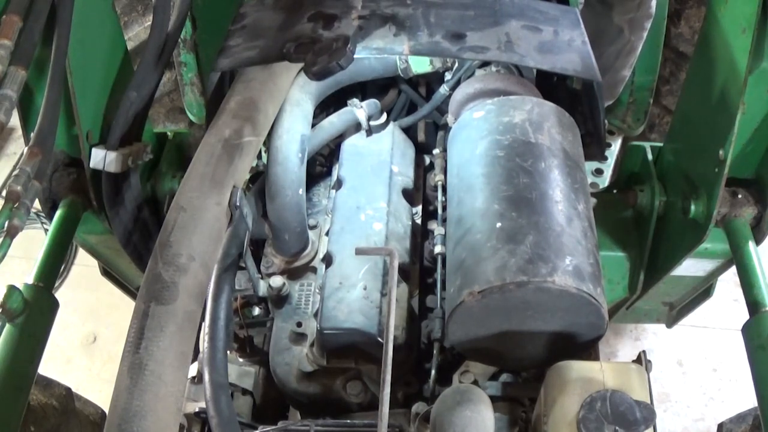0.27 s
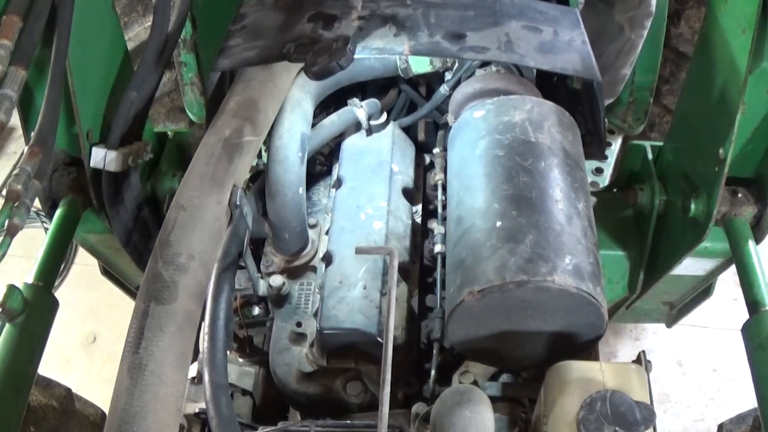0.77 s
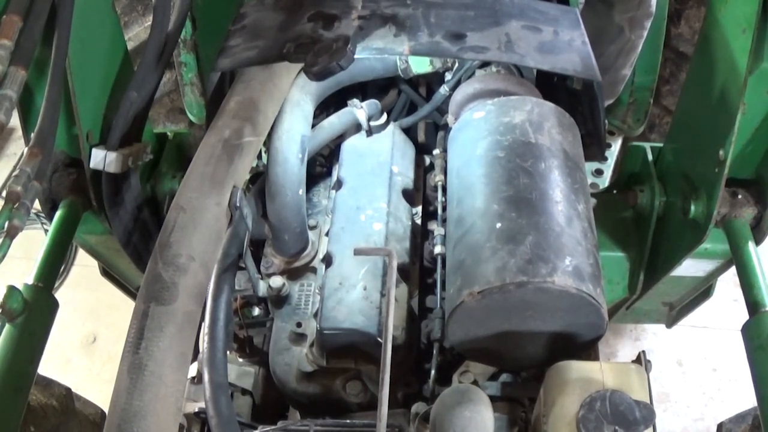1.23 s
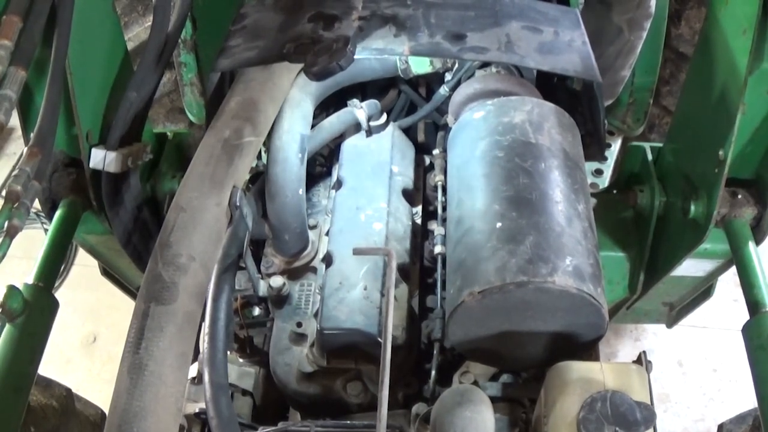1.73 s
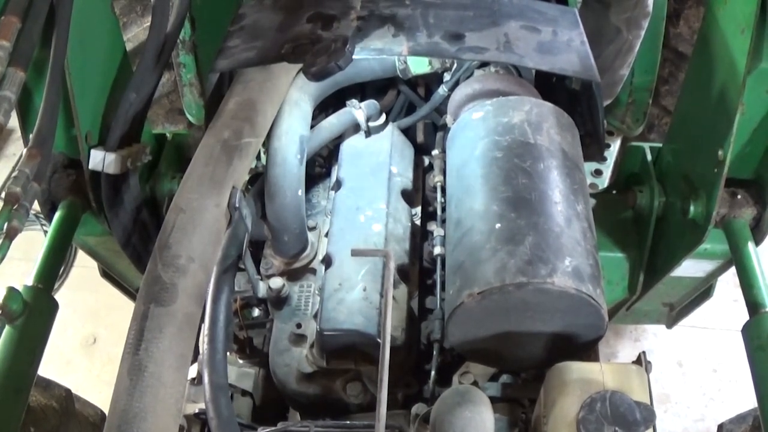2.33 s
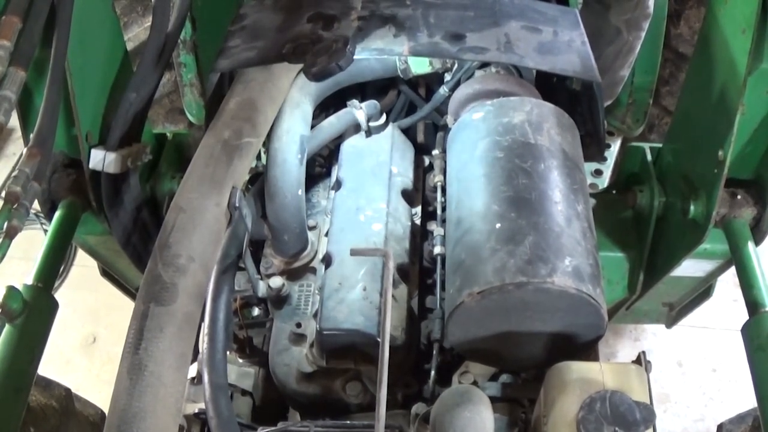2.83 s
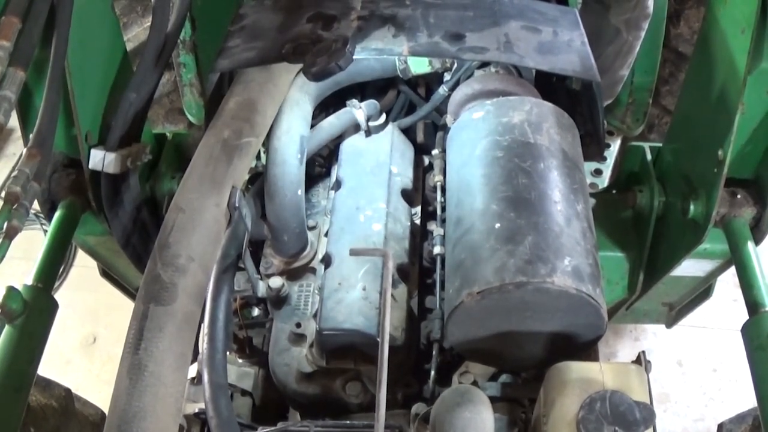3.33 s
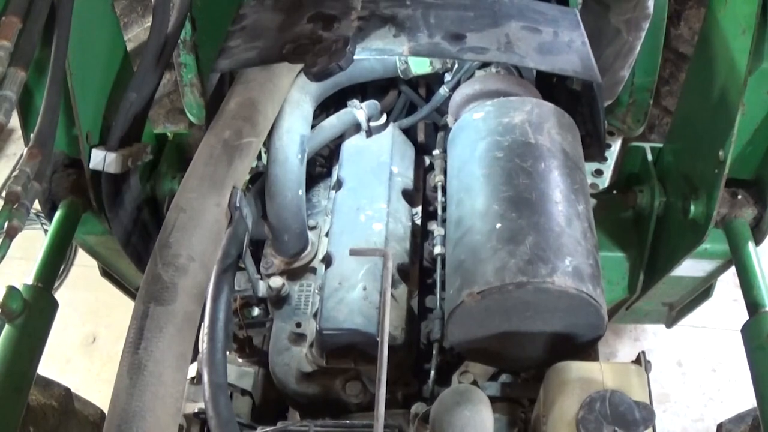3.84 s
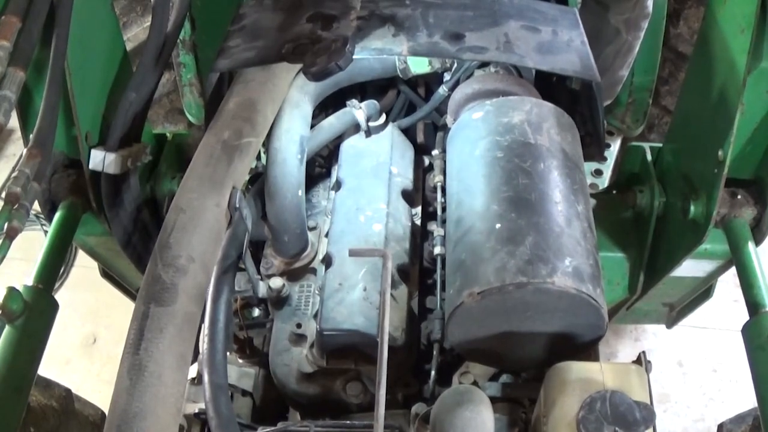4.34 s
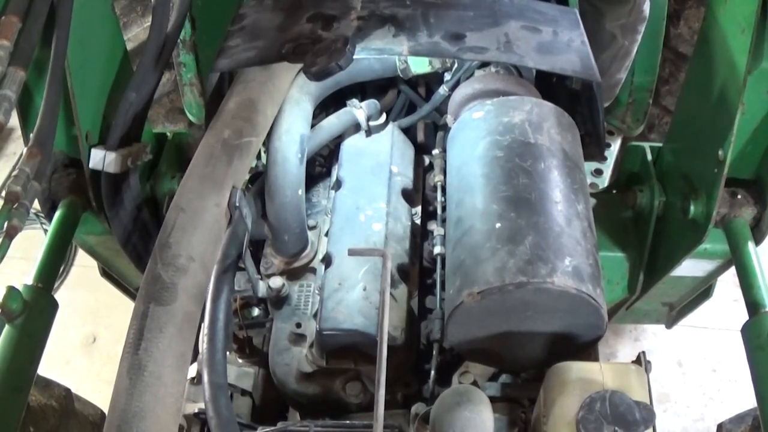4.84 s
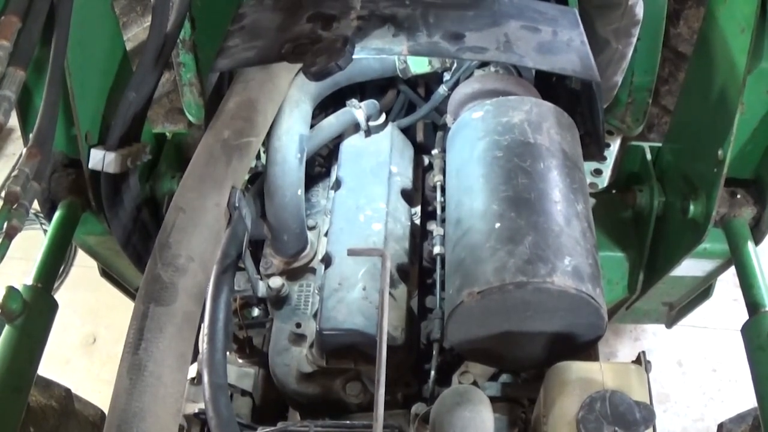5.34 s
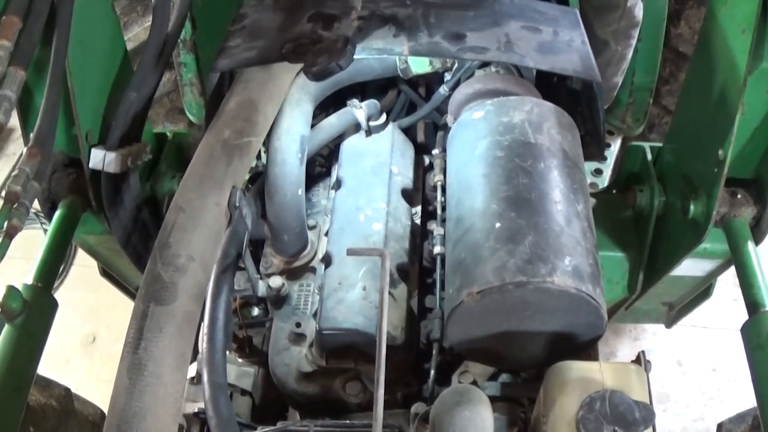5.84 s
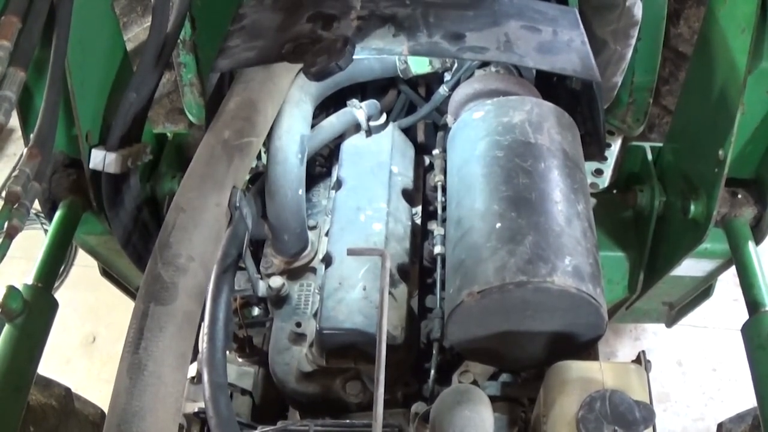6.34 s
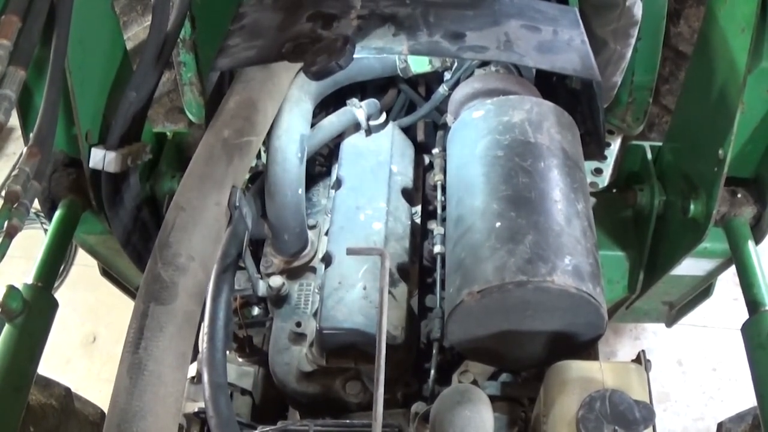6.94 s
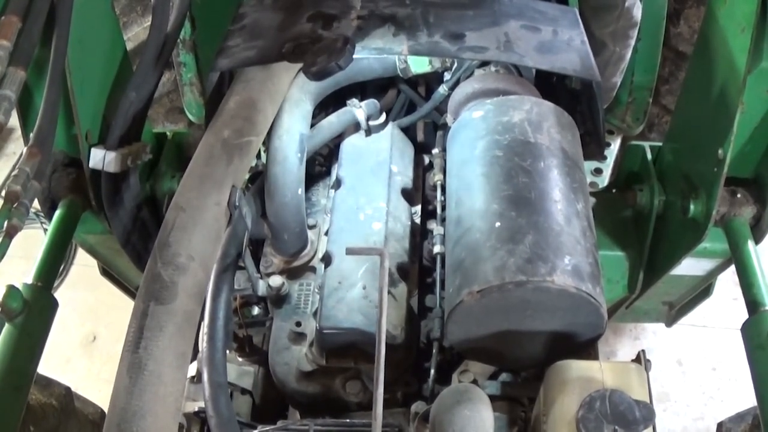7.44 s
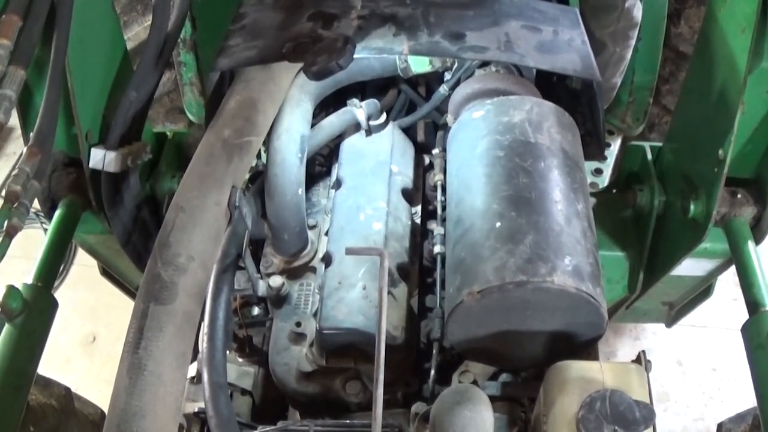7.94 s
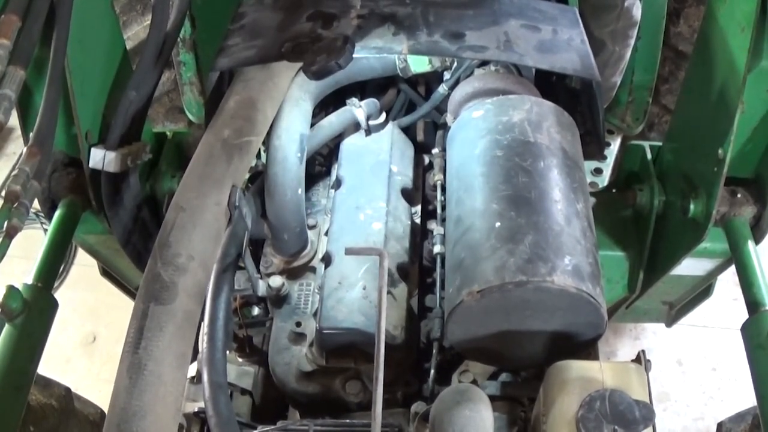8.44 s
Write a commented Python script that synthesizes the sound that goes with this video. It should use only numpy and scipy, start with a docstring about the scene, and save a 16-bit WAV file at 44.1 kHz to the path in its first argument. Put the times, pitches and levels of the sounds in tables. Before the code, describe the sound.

A quiet workshop with faint airy noise and a thin wavering hum. Under a second in, a hard metallic clash and thud: the starter engages, groans and squeals through the first compressions, then speeds into a rapid, steady rur-rur-rur, about five and a half pulses a second. Gritty tooth grinding, whine, chirps and low intake gulps repeat. The engine never fires. Close stereo microphone, short metallic room echo.

```python
"""In a workshop with a faint wavering hum, a diesel tractor engine is cranked and never fires.
The solenoid throws the pinion in, with decaying noise strokes for clash and thud, and the starter runs up.
Gear tones and tooth blows follow one crank cycle: each compression drags them down and makes the teeth grind.
Past the top the crank springs ahead, the teeth rattle in their backlash, and filtered noise and a rising
sine make the intake gulp and hoot. Metalwork resonances and a decaying noise echo colour the sound."""
import sys
import numpy as np
from scipy import signal
from scipy.fft import rfft, irfft, next_fast_len
from scipy.io import wavfile
from scipy.ndimage import uniform_filter1d, minimum_filter1d, map_coordinates

SR = 44100
rng = np.random.default_rng(int(sys.argv[2]) if len(sys.argv) > 2 else 0)


def dump(signal):
    """Clip the signal to [-1, 1] and save it as 16-bit WAV at the path in sys.argv[1]."""
    limited = np.clip(np.atleast_2d(signal).T, -1, 1)
    pcm = np.round(limited * 32767).astype(np.int16)
    wavfile.write(sys.argv[1], SR, pcm)


N = 383229
START = .783  # s, when the starter engages


def amp(db):
    """Logarithmic level: decibels to amplitude gain."""
    return 10 ** (np.asarray(db) / 20)


def unit(x):
    """Power normalisation: scale to rms 1."""
    return x / np.sqrt(np.mean(x ** 2) + 1e-20)


def clock():
    """Sampled time: the time of each sample in seconds."""
    return np.arange(N) / SR


def along(points, hz):
    """Logarithmic frequency scale: read (Hz, value) points along a log axis."""
    f, v = np.transpose(points)
    return np.interp(np.log(hz + 1), np.log(f + 1), v)


def curves(rows, at):
    """Linear interpolation: each column after the first, read at the given positions."""
    positions, *columns = np.transpose(rows)
    return [np.interp(at, positions, column) for column in columns]


def wobble(rate):
    """Slow random modulation: a smooth curve with the given number of knots a second."""
    knots = rng.standard_normal(int(N * rate / SR) + 4)
    return map_coordinates(knots, [np.arange(N) * rate / SR])


def coloured(x, level):
    """Minimum-phase filtering: a causal filter whose gain in dB is level(Hz)."""
    size = 2 * next_fast_len(N // 2 + SR // 4)
    cepstrum = irfft(np.log(amp(level(np.fft.rfftfreq(size, 1 / SR)))))
    # folding the cepstrum onto positive times makes the filter causal
    cepstrum[1:size // 2] *= 2
    cepstrum[size // 2 + 1:] = 0
    return irfft(rfft(x, size) * np.exp(rfft(cepstrum)))[..., :N]


def noise(spectrum):
    """Turbulence and friction as random noise: rms 1, with the given spectrum."""
    return unit(coloured(rng.standard_normal(N), lambda hz: along(spectrum, hz)))


def ringing(x, modes):
    """Modal resonance: x through the summed responses of a few damped modes, at rms 1."""
    def response(f):
        total = 0
        for k, (centre, width, db) in enumerate(modes):
            damping = 1j * f * width
            total = total + (-1) ** k * amp(db) * damping / (centre * centre - f * f + damping)
        return total
    return unit(coloured(x, lambda hz: 20 * np.log10(abs(response(hz)) + 1e-6)))


def swing(stroke, at):
    """Periodic loading: between -1 and 1 once a stroke, highest at the given share of it."""
    return np.cos(2 * np.pi * (stroke - at))


def burst(stroke, at, width, rest_db):
    """Gated excitation: dB of one flat-topped burst a stroke, 0 at its top, over a resting level."""
    away = (stroke - at + .5) % 1 - .5
    return rest_db * (1 - np.exp(-(away / width) ** 4))


def swell(s, half):
    """Transient envelope: a flat-topped rise and fall around the time s."""
    return np.exp(-((clock() - s) / half) ** 4)


def rough_tone(cycles, rough, wander):
    """Amplitude and phase modulation: a sine that flutters in strength and phase."""
    phase = 2 * np.pi * cycles + wander * wobble(170)
    return np.sin(phase) * (1 + rough * wobble(220))


# Background noise of the quiet workshop. Each row: frequency in Hz, relative density in dB per Hz.
ROOM_NOISE = [(18, -61), (30, -38), (148, -15.5), (369, -4.5), (399, 1), (673, -4.5), (1230, -3.5),
              (1360, -8), (1550, -8), (1680, -9), (6050, -14), (12900, -25.5), (15500, -27)]
# Machine hum. Each row: frequency in Hz, mean level in dB.
HUM_TONES = [(398.4, -76), (796.7, -72), (1593, -64), (8522, -73)]


def ambience():
    """Steady background field: shared and separate room noise, with a gently wavering machine hum."""
    hum = np.zeros(N)
    for hz, db in HUM_TONES:
        phase = 2 * np.pi * hz * clock() + .2 * wobble(7)
        hum += amp(db + wobble(7.6)) * np.sqrt(2) * np.sin(phase)
    separate = np.array([noise(ROOM_NOISE), noise(ROOM_NOISE)])
    return amp(-57.0) * noise(ROOM_NOISE) + hum + amp(-61.0) * separate


# Decay of the room. Each row: frequency in Hz, t60 in seconds.
ROOM_DECAY = [(200, 0.79), (1500, 0.56), (5000, 0.13), (12000, 0.3)]
# Stereo spread of the echoes. Each row: frequency in Hz, relative side level in dB.
ECHO_WIDTH = [(60, -19), (250, -7), (500, -5), (2000, -3), (8000, 0), (12000, -22)]


def workshop(x, wet_db, side_db):
    """Reverberation: nearby metal and walls answer in a dense tail, partly different at the two ears."""
    hz, t, z = signal.stft(rng.standard_normal((2, SR // 2)), SR, nperseg=256)
    fade = amp(-60 * t / along(ROOM_DECAY, hz)[:, None])
    tails = signal.istft(z * fade, SR, nperseg=256)[1]
    tails = tails / np.linalg.norm(tails[0])
    delayed = np.pad(x, (SR // 300, 0))[None]  # 1/300 s to the first echo
    mid, side = signal.fftconvolve(delayed, tails, axes=1)[:, :N]
    side = amp(side_db) * coloured(side, lambda f: along(ECHO_WIDTH, f))
    return x + amp(wet_db) * mid + np.array([side, -side])


# Mean pace: the crank runs up, holds, then sags a little.
# Each row: time in seconds, compression strokes per second.
CRANK_PACE = [(.78, 1), (.86, 2.48), (1.04, 3.72), (1.16, 4.6), (1.4, 5.04), (2.3, 5.48), (4.2, 5.507),
              (6.7, 5.512), (7.3, 5.4), (8.69, 5.35)]
# The starter labours through the first two compressions. Each row: time in seconds, tooth rate in Hz.
LABOURED_RUN_UP = [(.78, 60), (.85, 215), (.94, 293), (1.0, 299), (1.045, 293), (1.08, 355), (1.12, 432),
                   (1.195, 465), (1.24, 382), (1.26, 380), (1.3, 412), (1.34, 465)]
# Speed within a stroke. Each row: share of the stroke, speed as a share of the mean.
STROKE_SURGE = [(0, .878), (.12, .935), (.2, .988), (.4, 1.052), (.6, 1.098), (.75, 1.04), (.85, .955),
                (.93, .878), (1, .878)]
FIRST_TOP_S = 1.042  # top of the first compression; shares of a stroke count from each top
TEETH_PER_STROKE, STROKES_PER_TURN = 91.4, 3  # tooth blows per stroke, strokes per turn of the crank


def crank():
    """Cyclic torque loading: stroke position, strokes per second, and a tooth rate dragged by compression."""
    t = clock()
    pace, = curves(CRANK_PACE, t)
    strokes = np.cumsum(pace) / SR
    stroke = (strokes - np.interp(FIRST_TOP_S, t, strokes)) % 1
    surge, = curves(STROKE_SURGE, stroke)
    run_up_hz, = curves(LABOURED_RUN_UP, t)
    tooth_hz = np.where(t < LABOURED_RUN_UP[-1][0], run_up_hz, TEETH_PER_STROKE * pace * surge)
    return stroke, pace, uniform_filter1d(tooth_hz, size=300) * (1 + .004 * wobble(30))


# Course of the bass. Each row: time in seconds, relative level in dB.
BASS_COURSE = [(1.1, -5.5), (2.2, -3.6), (5.8, -3), (7.1, -7), (8.69, -9)]


def bass_level():
    """Slow spectral balance: the course of the bass in dB."""
    return curves(BASS_COURSE, clock())[0]


# A cylinder draws air. Each row: share of the stroke, relative flow in dB.
INTAKE_FLOW = [(0, -20), (.15, -11), (.3, -10), (.45, 0), (.65, -8), (.8, -22), (1, -20)]
# Air box resonances. Each row: frequency in Hz, width in Hz, relative level in dB.
AIR_BOX_MODES = [(94, 31, -6), (233, 24, -2)]
# Rocking of the engine block. Each row: frequency in Hz, relative density in dB per Hz.
BLOCK_NOISE = [(20, -3), (50, -6), (100, 1), (170, -8), (300, -23), (800, -80)]
LOAD_AT, LOAD_DB = 0.91, 1.06  # tooth load peaks just before the top: share of the stroke, +- dB
HEAVE_DB = 8.5  # the block heaves with the load, +- dB
HOOT_CYCLES, HOOT_RISE = 37.3, .45  # cycles of the hoot per stroke, its rise in pitch (share per stroke)
INTAKE_AT = .51  # share of the stroke where the hoot passes its middle pitch
HOOT_DB, GULP_DB, ROCK_DB = -47.5, -55.5, -67  # gains before the flow, bass and load shape them


def engine(stroke, pace):
    """Cavity resonance: each cylinder draws a gulp and rising hoot, and the block rocks at each compression."""
    flow_db, = curves(INTAKE_FLOW, stroke)
    turning = np.clip((clock() - START) / 0.65, 0, 1)
    air = noise([(40, -20), (90, 4.0), (240, 15.5), (400, -26), (1000, -85)])
    gulps = ringing(amp(0.28 * flow_db + 4.5 * swing(stroke, 0.61)) * air, AIR_BOX_MODES)
    hoot_hz = HOOT_CYCLES * pace * (1 + HOOT_RISE * (stroke - INTAKE_AT))
    hoot_phase = 2 * np.pi * np.cumsum(hoot_hz) / SR + .3 * wobble(70)
    hoot = amp(flow_db + wobble(12)) * np.sin(hoot_phase)
    rocking = amp(HEAVE_DB * swing(stroke, LOAD_AT)) * noise(BLOCK_NOISE)
    low = amp(bass_level()) * (amp(GULP_DB) * gulps + amp(ROCK_DB) * rocking)
    return turning * (amp(HOOT_DB) * turning ** 2 * hoot + low)


# Resonances and dips of the bell housing and panels.
# Each row: frequency in Hz, width in Hz, lift in dB.
HOUSING_MODES = [(298, 16, -1.5), (365.6, 7.7, 4.5), (477, 16, 5), (510, 16, 3.5), (560, 12, 4),
                 (598.7, 30, 6.5), (685, 30, 2.5), (907.4, 27.6, 6), (996, 33, 5), (1292, 17, -3),
                 (1470, 22, 3.5), (1594, 47, 2.5), (1670, 14, 4.5), (1820, 53, 1.5), (1914, 72, 6),
                 (2003, 29, 2.5), (2300, 77, 3.5), (2750, 80, 2.5), (3035, 107, 4.5), (3260, 60, 4),
                 (3474, 61, 6), (3710, 85, 2), (4300, 110, 3), (4970, 82, 6), (6230, 340, 1),
                 (7660, 190, 2.5), (8200, 200, 3.5)]


def housing(hz):
    """Structural resonance: lift in dB that the metalwork gives each frequency."""
    return sum(db / (1 + (2 * (hz - c) / w) ** 2) for c, w, db in HOUSING_MODES)


# A faint tick, then solenoid, pinion and gear engaging.
# Each row: start in seconds, clash level in dB, thud level in dB, t60 in seconds.
ENGAGE_STROKES = [(.455, -51, -70, .1), (.775, -40, -60, .1), (.783, -17.5, -50, .2),
                  (.816, -19.5, -45, .2), (.845, -28, -28, .3), (.89, -33, -33, .25)]
# Spectrum of the clash. Each row: frequency in Hz, relative density in dB per Hz.
CLASH_NOISE = [(100, -37), (400, -8), (900, -2), (1800, 5), (3000, -1), (5000, -1), (9000, -5),
               (11000, -14), (15500, -30)]
# Spectrum of the thud. Each row: frequency in Hz, relative density in dB per Hz.
THUD_NOISE = [(30, -40), (85, -7), (200, 2), (330, 5.5), (600, 10.5), (1000, 8), (3000, -51)]


def engagement():
    """Impact excitation: the pinion slams into the ring gear and the engine jolts into motion."""
    clash, thud = np.zeros(N), np.zeros(N)
    for s, clash_db, thud_db, t60 in ENGAGE_STROKES:
        age = np.maximum(clock() - s, 0)
        decay = (1 - np.exp(-age / 0.0018)) * amp(-60 * age / t60)
        clash += amp(clash_db) * decay
        thud += amp(thud_db) * decay
    return coloured(clash * noise(CLASH_NOISE) + thud * noise(THUD_NOISE), housing)


def inrush():
    """Inertial loading: strain of 1 when the starter engages, fading as the flywheel comes up to speed."""
    inrush_s = 0.39
    return np.exp(-(np.maximum(clock() - START, 0) / inrush_s) ** 2)


def impacts(teeth, scatter_db, scrape):
    """Tooth impact and friction: one uneven, mistimed blow per tooth, with sliding noise throughout."""
    count = int(teeth[-1])
    at = np.searchsorted(teeth, np.arange(count) + rng.random(count))
    sizes = amp(scatter_db * np.clip(rng.standard_normal(count), -2, 2)) * rng.choice([-1, 1], count)
    blows = unit(np.bincount(at, sizes, N)[:N])
    return unit(blows + scrape * rng.standard_normal(N))


def pinion_beat(teeth, runout):
    """Eccentric rotation: a gain that swells once per turn of the slightly eccentric pinion."""
    pinion_teeth = 11
    return 1 + runout * np.sin(2 * np.pi * teeth / pinion_teeth)


# Chirps of the floating pinion in each stroke.
# Each row: share of the stroke, half length as a share, frequency in Hz, level in dB.
PINION_CHIRPS = [(.582, .024, 8300, -27), (.62, .05, 6500, -29.5), (.645, .065, 4980, -29),
                 (.705, .022, 8430, -32), (.74, .05, 6470, -26)]
# Rings of the pinion during the run-up.
# Each row: centre in seconds, half length in seconds, frequency in Hz, level in dB.
RUN_UP_RINGS = [(.826, .012, 12700, -33), (.98, .055, 1660, -27), (1.1, .028, 1660, -21),
                (1.19, .04, 8330, -33.5), (1.245, .02, 6470, -27)]
PING_FALL, PING_FALL_AT = .15, .66  # chirps fall in pitch (share per stroke), in tune at this share


def pings(stroke, pace, rough, wander):
    """Free vibration: the unloaded pinion chirps in every stroke, and rings while it settles into mesh."""
    falling_time = np.cumsum(1 - PING_FALL * (stroke - PING_FALL_AT)) / SR
    chirps, rings = np.zeros(N), np.zeros(N)
    for at, half, hz, db in PINION_CHIRPS:
        level = amp(db + burst(stroke, at, half, -40) + 1.5 * wobble(8))
        chirps += level * rough_tone(hz * falling_time, rough, wander)
    for s, half, hz, db in RUN_UP_RINGS:
        rings += amp(db) * swell(s, half) * rough_tone(hz * clock(), rough, wander / 2)
    return chirps * (pace / pace.max()) ** 2 + rings


def rasp(stroke, teeth, rough, wander):
    """Renewed tooth contact: a hoarse falling scrape as the next compression builds."""
    order, at, half, db = 6.1, .87, .24, -32.5  # multiple of the tooth rate, shares of the stroke, dB
    return amp(db + burst(stroke, at, half, -32)) * rough_tone(order * teeth, rough, wander)


# Grinding of the teeth. Each row: frequency in Hz, relative density in dB per Hz.
GRIND_SPECTRUM = [(200, -57.5), (500, -15), (850, -5), (1200, -4.5), (1550, 2), (2200, 0), (3000, -2),
                  (4000, -7), (5600, -13), (9000, -13), (11500, -38), (15500, -54)]
# The first compressions, taken without momentum, make single gear tones groan and squeal.
# Each row: centre in seconds, half length in seconds, multiple of the tooth rate, level in dB.
GROAN_TONES = [(.875, .028, 3.9, -31), (1.0, .058, 2, -24.5), (1.075, .035, 2, -34), (1.0, .05, 3, -35),
               (.99, .035, 6.2, -36), (1.085, .045, 8.7, -28.5), (1.17, .05, 8.9, -32),
               (1.28, .045, 1, -29.5), (1.275, .035, 2, -30.5), (1.29, .045, 8.4, -30), (1.48, .03, 2, -33),
               (1.67, .035, 2, -35)]
BUZZ_DB = -9  # tooth buzz under a groan, relative to its tone


def groans(teeth, rough, wander):
    """Forced periodic contact: teeth strike in even time, a buzz with one strong gear tone."""
    blows = np.diff(np.floor(teeth + .3), prepend=0) * (1 + .4 * wobble(200))
    buzz = amp(BUZZ_DB) * unit(coloured(blows, lambda hz: along(GRIND_SPECTRUM, hz)))
    total = np.zeros(N)
    for s, half, order, db in GROAN_TONES:
        tone = rough_tone(order * teeth, rough, wander * order)
        total += amp(db) * swell(s, half) * (tone + buzz)
    return total


# Knocking of the worn teeth. Each row: frequency in Hz, relative density in dB per Hz.
GROWL_SPECTRUM = [(30, -54), (150, -24), (290, -10.5), (440, 4), (600, 4), (750, 2.5), (1000, 1.5),
                  (1400, 2), (2500, -30)]
GROWL_AT, GROWL_SWING_DB = .99, 5  # it peaks under compression: share of the stroke, +- dB
# the teeth change flanks: centre and half length (shares of the stroke), dB relative to the growl
CLUNK_AT, CLUNK_WIDTH, CLUNK_DB = .66, .06, -4


def growl(stroke, teeth, scatter_db, runout):
    """Periodic wear: teeth knock in a pattern repeated every crank turn, hardest under compression."""
    per_turn = round(STROKES_PER_TURN * TEETH_PER_STROKE)
    late = rng.random(per_turn)
    sizes = amp(scatter_db * np.clip(rng.standard_normal(per_turn), -2, 2)) * rng.choice([-1, 1], per_turn)
    tooth = np.arange(int(teeth[-1]))
    at = np.searchsorted(teeth, tooth + late[tooth % per_turn])
    blows = unit(np.bincount(at, sizes[tooth % per_turn], N)[:N])
    knocks = (blows + .4 * rng.standard_normal(N)) * pinion_beat(teeth, runout)
    knocks = unit(coloured(knocks, lambda hz: along(GROWL_SPECTRUM, hz)))
    compression = amp(GROWL_SWING_DB * swing(stroke, GROWL_AT))
    clunk = amp(CLUNK_DB + burst(stroke, CLUNK_AT, CLUNK_WIDTH, -16))
    return knocks * (compression + clunk)


# Gear tones. Each row: multiple of the tooth rate, relative level in dB, swell in +- dB over a stroke,
# share of the stroke where the swell term is highest (a negative swell is softest there).
GEAR_TONES = [(1, -45, 2, 0.022), (2, -36.5, 2.5, 0.83), (2.72, -39, 7, 0.32), (3.5, -37.5, 6.5, 0.12),
              (4, -39.5, -0.5, .9), (6.14, -42.5, 9, 0.91), (8.3, -41, 2, 0.12), (8.85, -37.5, 1, 0.062)]


def whine(stroke, teeth, rough, wander, runout):
    """Gear-mesh orders: rough tones swell within the stroke, and the eccentric pinion beats them each turn."""
    radiating_hz = 370
    tones = np.zeros(N)
    for order, db, swell_db, at in GEAR_TONES:
        level = amp(db + swell_db * swing(stroke, at))
        tones += level * rough_tone(order * teeth, rough, wander * np.sqrt(order))
    # the housing is too small to radiate the lowest tones
    tones = signal.sosfilt(signal.butter(6, radiating_hz, "highpass", fs=SR, output="sos"), tones)
    return tones * pinion_beat(teeth, runout)


def main_whine(stroke, teeth, rough, wander):
    """Dominant mesh order: it sings as the crank runs free, and the pinion's runout gives it side tones."""
    multiple, sing_at, sing_db, runout = 3.07, .64, 4.5, .2  # of tooth rate, share of stroke, +- dB, depth
    up_to_speed = np.clip((clock() - START) / .75, 0, 1)
    tone = rough_tone(multiple * teeth, rough, wander) * pinion_beat(teeth, runout)
    return up_to_speed * amp(sing_db * swing(stroke, sing_at)) * tone


# Hiss of the brushes. Each row: frequency in Hz, relative density in dB per Hz.
BRUSH_NOISE = [(1000, -27.5), (3500, -2), (5500, 2), (8500, 1), (9500, 0), (10500, -9.5), (12500, -18),
               (15500, -34)]
# Rings of the pinion and ring gear. Each row: frequency in Hz, width in Hz, relative level in dB.
PINION_MODES = [(1710, 112, -7.5), (5020, 120, -9), (6000, 75, -2), (6495, 157, -1), (8320, 90, -4.5)]
# base gains in dB, before load, speed and housing shape them
GRIND_DB, GROWL_DB, BRUSH_DB, WHINE_DB, SONG_DB, RATTLE_DB = -26, -32.5, -31.5, 0.5, -27.3, -35
RATTLE_AT, RATTLE_WIDTH, RATTLE_REST_DB = 0.78, 0.16, -5  # shares of the stroke, dB between bursts
BRUSH_GROWS_DB = 9  # rise of the brush hiss from rest to full speed, apart from the load
BRUSH_DIP, BRUSH_DIP_INRUSH = 1.0, 3.2  # dB the hiss drops per dB of load: always, and more in the run-up


def starter(stroke, pace, tooth_hz):
    """Structure-borne sound: teeth, whine and brushes sound through the housing; the pinion pings and rattles."""
    teeth = np.cumsum(tooth_hz) / SR
    speed = pace / pace.max()
    load_db = LOAD_DB * swing(stroke, LOAD_AT)
    bass_db = bass_level()
    running = np.clip((clock() - START) / 0.098, 0, 1)

    blows = impacts(teeth, scatter_db=3, scrape=1.7)
    grind_db = GRIND_DB + load_db - 0.19 * bass_db + 0.72 * wobble(40)
    grind = amp(grind_db) * unit(coloured(blows, lambda hz: along(GRIND_SPECTRUM, hz)))
    knocking = amp(GROWL_DB + .7 * bass_db) * growl(stroke, teeth, scatter_db=3.5, runout=.22)
    # the brushes hiss most when the armature spins fastest
    spin_db = BRUSH_GROWS_DB * (speed - 1) - (BRUSH_DIP + BRUSH_DIP_INRUSH * inrush()) * load_db
    brushes = noise(BRUSH_NOISE) * amp(BRUSH_DB + spin_db + 2.18 * wobble(120))
    tones = amp(WHINE_DB) * speed * whine(stroke, teeth, rough=.45, wander=.3, runout=.2)
    song = amp(SONG_DB) * main_whine(stroke, teeth, rough=.38, wander=.36)
    strain = groans(teeth, rough=.25, wander=.05) + rasp(stroke, teeth, rough=.7, wander=1.9)
    body = coloured(running * (grind + knocking + tones + song + brushes + strain), housing)

    rattle_db = burst(stroke, RATTLE_AT, RATTLE_WIDTH, RATTLE_REST_DB) + 1.2 * wobble(25)
    backlash = impacts(teeth, scatter_db=2.5, scrape=1.2) * amp(rattle_db)
    rattle = amp(RATTLE_DB) * ringing(running * backlash, PINION_MODES)
    return body + rattle + running * pings(stroke, pace, rough=.55, wander=1.6)


def scene():
    """Superposition: the tractor in its workshop, slightly to the left, over the room's own sound."""
    stroke, pace, tooth_hz = crank()
    tractor = starter(stroke, pace, tooth_hz) + engine(stroke, pace) + engagement()
    left_right_db = [[.28], [-.28]]
    return workshop(tractor, wet_db=-8.0, side_db=-8.0) * amp(left_right_db) + ambience()


def record(dry):
    """Peak limiting and band limiting: gain drops smoothly around peaks, and the top band is removed."""
    ceiling, top_hz = .47, 15500
    needed = np.minimum(1, ceiling / (np.abs(dry).max(axis=0) + 1e-9))
    held = dry * uniform_filter1d(minimum_filter1d(needed, size=300), size=300)
    size = next_fast_len(N + SR // 4)
    passband = np.fft.rfftfreq(size, 1 / SR) < top_hz
    return irfft(rfft(held, size) * passband, size)[:, :N]


dry = scene()
out = record(dry)
dump(out)
```